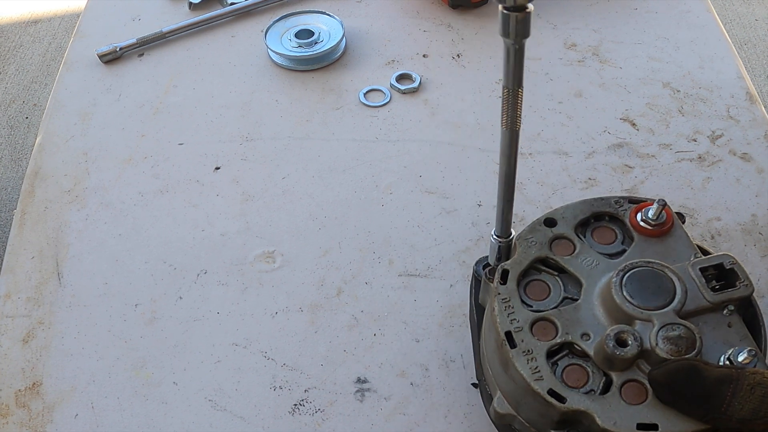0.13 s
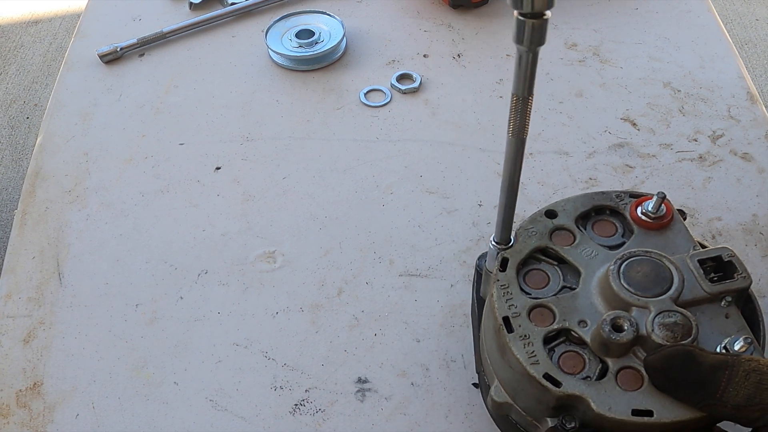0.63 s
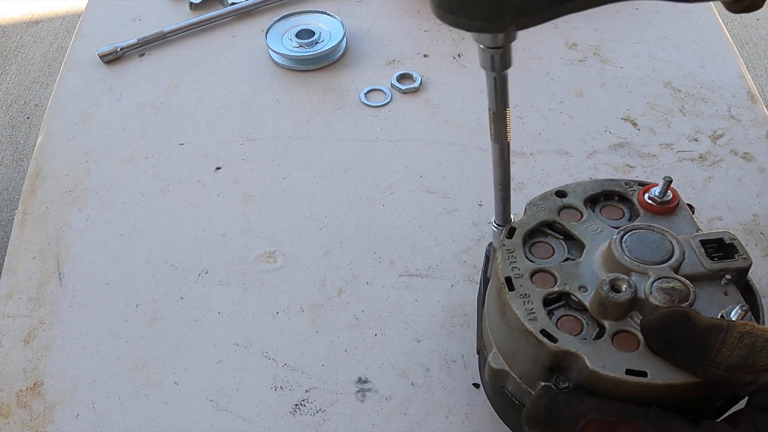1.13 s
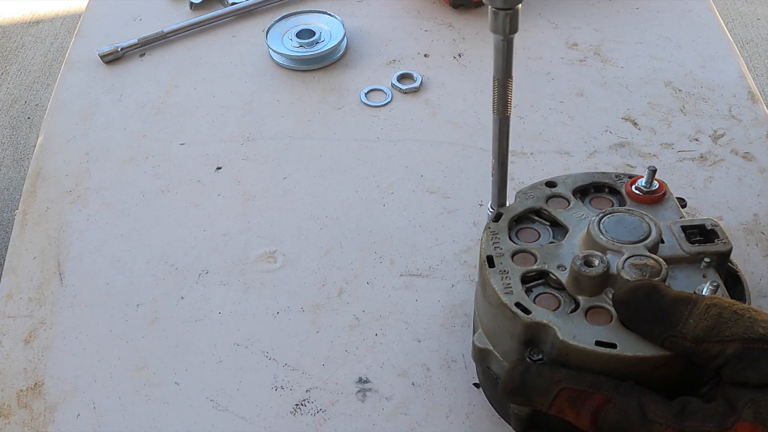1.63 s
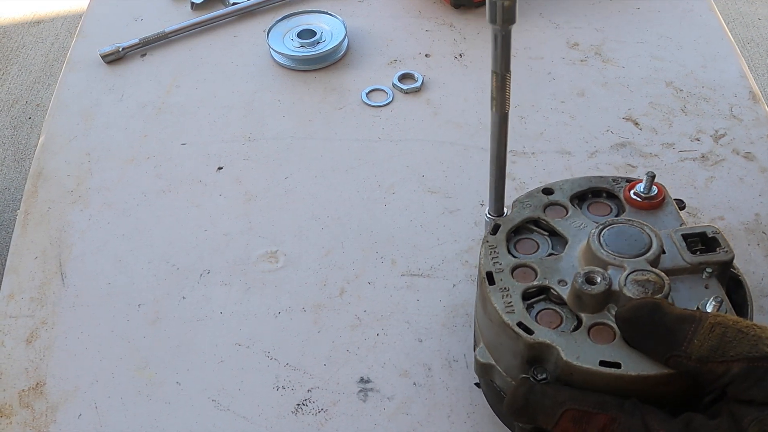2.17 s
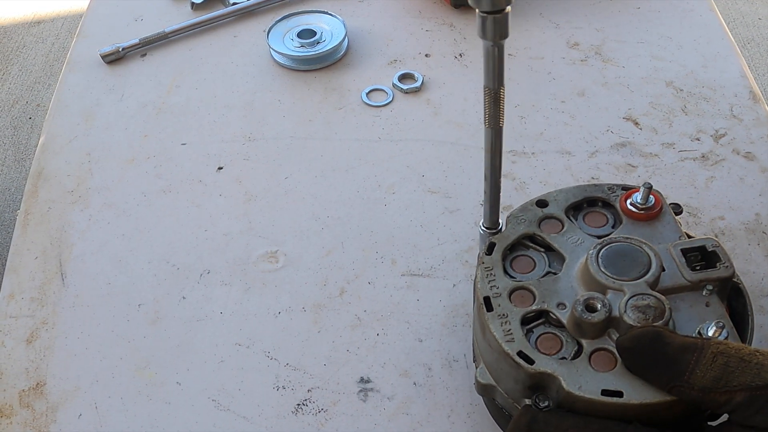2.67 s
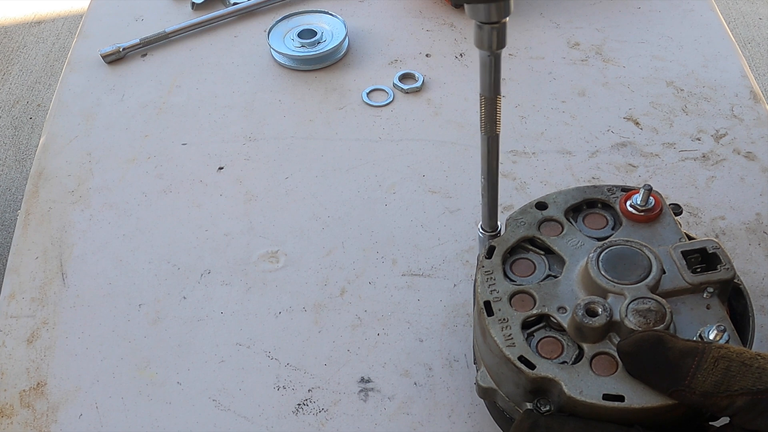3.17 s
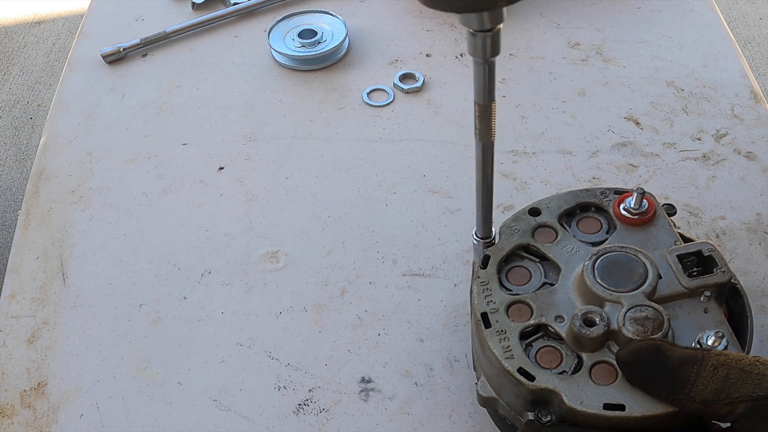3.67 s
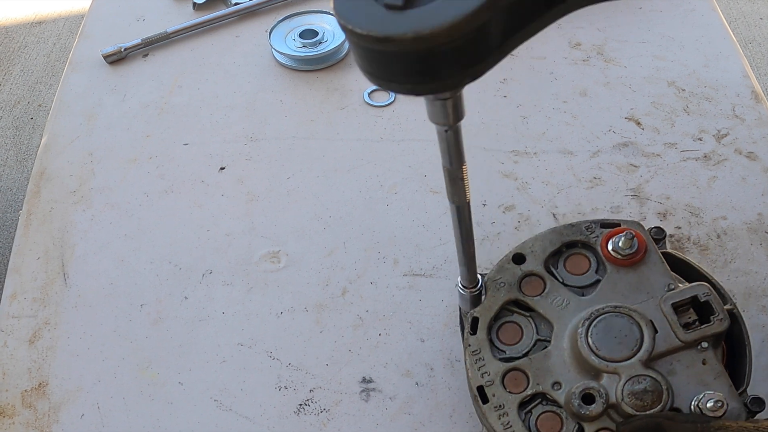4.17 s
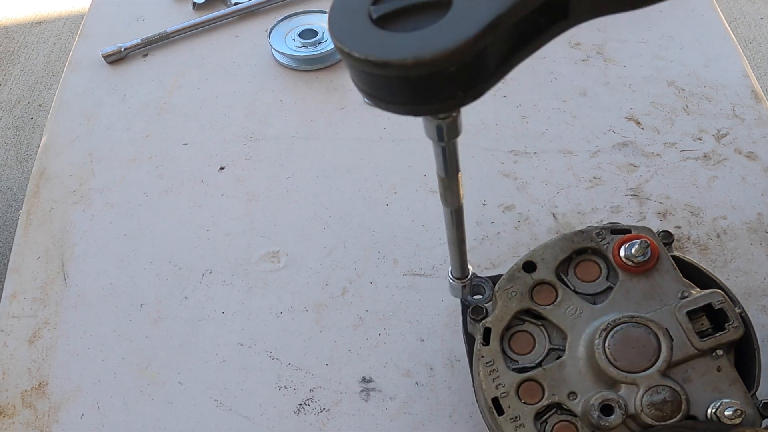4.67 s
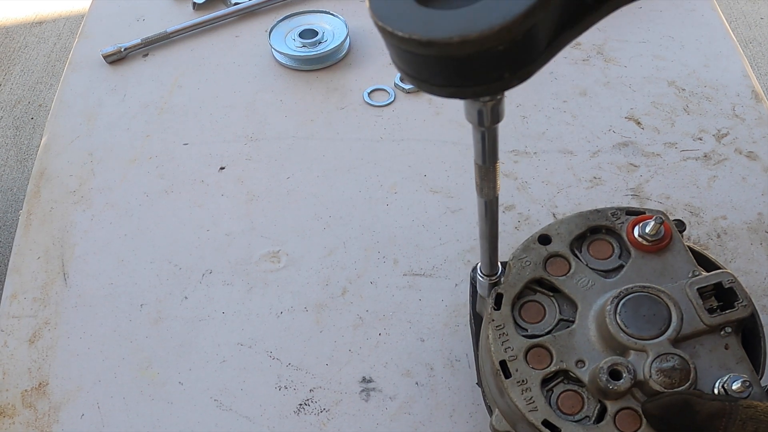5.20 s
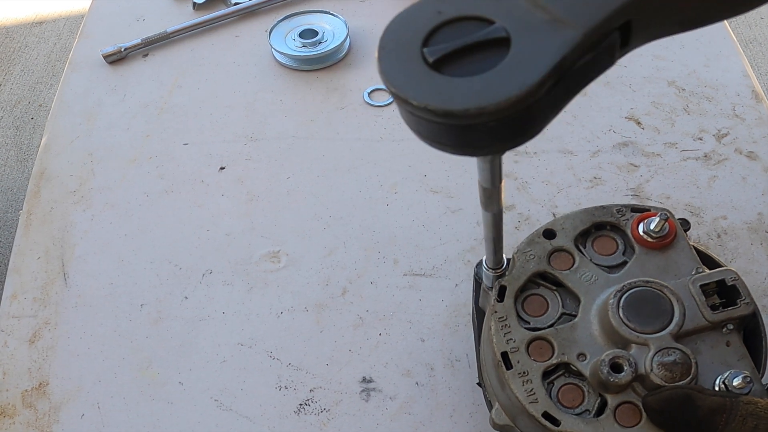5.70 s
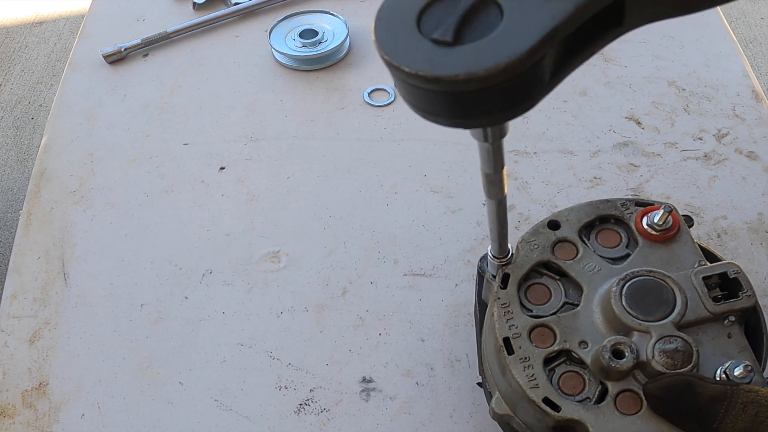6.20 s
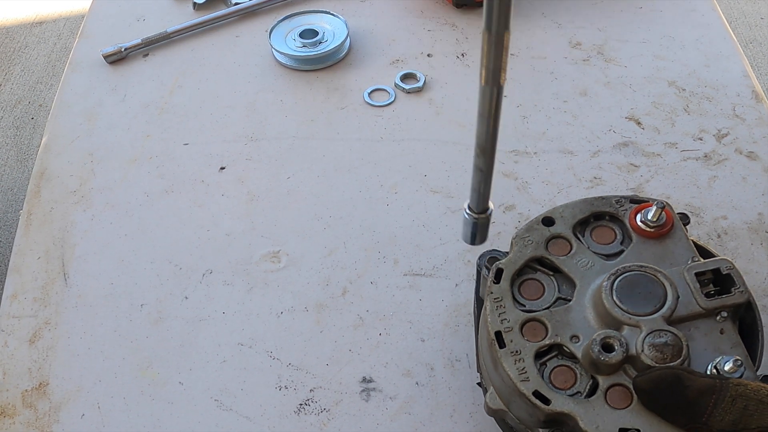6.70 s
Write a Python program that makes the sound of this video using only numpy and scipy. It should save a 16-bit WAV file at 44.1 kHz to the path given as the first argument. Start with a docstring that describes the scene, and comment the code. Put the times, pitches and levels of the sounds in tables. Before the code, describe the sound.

Near stereo microphones pick up an air-powered ratchet undoing bolts outdoors. First come light metallic taps, dull low knocks and distant chirps over low rumble. The tool starts abruptly, its dense airy roar fluttering fast over a thin steady whine, then cuts off with a quick falling pitch. Taps and thuds fill the gap before a second burst under a second long, with a short reflection from nearby walls.

```python
"""Air ratchet on an outdoor workbench

An air ratchet backs two bolts out of a cast metal case, in a long burst and a short one. Noise makes its
hiss, sine tones geared to one rotor its whine; each crank turn lifts the hiss twice, dips it, and rings the
pawl. Around the bursts the socket clinks (noise ringing damped modes), the bench thuds (low dying tones) and
small birds chirp (gliding tones). A low rumble (filtered noise) grows in the bursts; walls add a tail."""
import sys
import numpy as np
from scipy import signal
from scipy.fft import rfft, irfft, next_fast_len
from scipy.io import wavfile
from scipy.ndimage import uniform_filter1d

SR = 44100
rng = np.random.default_rng(int(sys.argv[2]) if len(sys.argv) > 2 else 0)


def attenuation_scalar(level_db):
    """Turn a level in dB into a linear amplitude multiplier (20 dB per decade)."""
    decades = np.asarray(level_db, float) / 20
    return 10 ** decades


def master(y):
    """Save y as 16-bit WAV."""
    cut = np.clip(np.atleast_2d(y).T, -1, 1)
    pcm = np.round(cut * 32767)  # scale
    wavfile.write(sys.argv[1], SR, pcm.astype(np.int16))


N = 301193
T = np.arange(N) / SR

# The two squeezes of the trigger: open_s, shut_s, quick_spin_up_s, slow_settling_s
TRIGGER_PULLS = [(1.162, 4.555, .023, .11), (5.71, 6.535, .028, .06)]
ROTOR_HZ = 489.3  # full speed, turns per second


def evened(x):
    """Scales a sound to an rms of 1."""
    return x / np.sqrt(np.mean(x ** 2) + 1e-20)


def read(points, hz):
    """Reads a spectrum between its points, on a log-frequency axis."""
    f, value = np.transpose(points)
    return np.interp(np.log(hz + 1), np.log(f + 1), value)


def coloured(x, points):
    """Filters a sound by a spectrum of (Hz, dB) points."""
    size = next_fast_len(x.shape[-1])
    gain = attenuation_scalar(read(points, np.fft.rfftfreq(size, 1 / SR)))
    return irfft(rfft(x, size) * gain, size)[..., :x.shape[-1]]


def wander(size):
    """Slow random drift of rms 1; a larger size (in samples) drifts more slowly."""
    once = uniform_filter1d(rng.standard_normal(N), size)
    return evened(uniform_filter1d(once, size))


def add(mix, s, sound):
    """Mixes a sound in at s seconds."""
    part = mix[round(s * SR):][:len(sound)]
    part += sound[:len(part)]


def curves(table):
    """Joins the rows of a table by straight lines in time, one curve for each column."""
    s, *values = np.transpose(table)
    return [np.interp(T, s, v) for v in values]


def low_rumble():
    """Low outdoor rumble plus the running tool's own low rumble, louder during the bursts: filtered noise."""
    # Shape of the rumble's spectrum: pitch_hz, level_db (per Hz, relative)
    spectrum = [(12, -25), (20, -1), (45, -1), (63, 4.5), (85, -3), (125, 0.5), (170, -4), (291, -21),
                (458, -31), (783, -28), (3060, -43), (3700, -44.5), (4460, -47), (9690, -60.5),
                (12000, -63), (15600, -102), (22000, -120)]
    # Level of outdoor and tool rumble together: time_s, level_db (before a 2 dB lift)
    rumble_levels = [(0.0, -53.5), (1.14, -53.5), (1.4, -57), (1.65, -51), (2.3, -49.5), (3.3, -51.5),
                     (4.3, -52.5), (4.8, -63.5), (5.1, -60.5), (5.95, -50), (6.15, -55), (6.83, -60.5)]
    level_db = curves(rumble_levels)[0] + 2.0 + 0.57 * wander(size=3000)
    return attenuation_scalar(level_db) * evened(coloured(rng.standard_normal(N), spectrum))


def clinks():
    """A few ms of rattling contact drives the damped modes of the case, one main ring and a dull crack."""
    # Socket on the case: contact_s (fullest contact, near this time; the sound begins 18 ms earlier), peak_db,
    # main_ring_hz, rattle_s, treble_tilt_db (per octave)
    hits = [(0.0014, -51, 2300, 0.02, -13), (0.107, -48, 4390, 0.002, 7), (0.124, -28, 4760, 0.0047, 3),
            (0.14, -37.5, 4100, 0.0078, -3), (0.287, -49.5, 3370, 0.0014, -3),
            (0.298, -50, 826, 0.0027, -3), (0.5936, -52, 883, 0.003, -2.5), (0.616, -43.5, 1160, 0.0027, 1),
            (0.6774, -67, 4680, 0.002, 9), (0.725, -47.5, 835, 0.0027, -2.5), (0.783, -44, 6340, 0.0022, 6),
            (0.7916, -32.5, 3760, 0.0018, 3.5), (1.054, -48, 1780, 0.0029, -11),
            (1.081, -50, 890, 0.002, -7), (1.123, -44, 816, 0.00091, -13), (4.95, -41, 2940, 0.0022, 5.5),
            (4.968, -53.5, 2970, 0.0029, 1), (5.087, -37, 4660, 0.003, -3.5),
            (5.1841, -54.5, 3660, 0.0017, -6), (5.541, -44.5, 1310, 0.005, -0.5),
            (5.567, -43, 1600, 0.0039, -6), (5.621, -55, 840, 0.0022, -16), (6.659, -51, 1440, 0.002, -1),
            (6.788, -42.5, 818, 0.004, -2.5)]
    # Ringing modes of the case: pitch_hz, level_db (before the tilt), ring_s (to fall 60 dB, cut short below)
    case_modes = [(746, -20, 0.2), (1200, -20, 0.13), (1890, -22, 1.3), (3120, -27, 0.052),
                  (3500, -16.5, 0.069), (3690, -6, 0.086), (4300, 2, 0.12), (5270, -7, 0.13),
                  (5720, -3, 0.11), (6300, -23, 0.12), (6460, -40, 0.12), (7420, -2, 0.076),
                  (8220, -6, 0.087), (8600, -11, 0.092)]
    out, t = np.zeros(N), np.arange(4000) / SR
    meet_s, lead_s = .02, .018  # fullest contact within the sound; the sound begins this early
    for s, db, hz, length, tilt_db in hits:
        # the parts scrape together, meet, and rattle apart
        from_meeting = abs(t - meet_s)
        scrape = .12 * np.exp(-from_meeting / np.where(t < meet_s, .005, .014))
        contact = rng.standard_normal(len(t)) * (np.exp(-from_meeting / length) + scrape)
        modes = np.zeros(len(t))
        for f, mode_db, ring_s in case_modes:
            level_db = mode_db + tilt_db * np.log2(f / 3000) + 1.7 * rng.standard_normal()
            fading = attenuation_scalar(level_db - 60 * t / min(0.13 * ring_s, .02))
            modes += fading * np.sin(2 * np.pi * f * rng.uniform(1.0, 1.04) * t)
        main = attenuation_scalar(-60 * t / .016) * np.sin(2 * np.pi * hz * t)
        crack = coloured(contact, [(300, -26), (900, 6 - 1.2 * tilt_db), (2500, -4), (4800, 5.0),
                                   (9000, 1.6 * tilt_db - 4.5), (14000, 0.74 * tilt_db - 20.5)])
        ringing = signal.fftconvolve(contact, modes + 2.2 * main)[:len(t)]
        sound = evened(ringing) + 1.3 * evened(crack)
        skipped = round(max(lead_s - s, 0) * SR)  # what would fall before time zero
        add(out, max(s - lead_s, 0), attenuation_scalar(db) * sound[skipped:] / abs(sound).max())
    return out


def shed(x):
    """Diffuse two-channel tail from nearby walls: noise in which each band dies at its own speed."""
    # How long the tail lasts: pitch_hz, time_s (to fall 60 dB)
    tail_times = [(200, 0.41), (1000, 0.51), (4000, 0.47), (10000, 0.33)]
    hz, t, z = signal.stft(rng.standard_normal((2, SR)), SR, nperseg=256)
    fading = attenuation_scalar(-60 * t / read(tail_times, hz)[:, None]) * (t > .008)
    tail = signal.istft(z * fading, SR, nperseg=256)[1]
    return signal.fftconvolve(x[None], tail / np.linalg.norm(tail[0]), axes=1)[:, :N]


def thuds():
    """The bench top swells and rings low after each push, as a few dying sine tones."""
    # Pushes on the bench: start_s, level_db (of the main tone, before its swell and decay), pitch_hz
    pushes = [(0.152, -39.5, 195.6), (.23, -46, 201), (0.631, -36, 168.6), (.74, -40.5, 174.5),
              (.80, -34.5, 151.5), (0.878, -43, 146), (5.105, -39, 159), (5.165, -42, 164),
              (5.399, -42.5, 150), (5.47, -50.5, 131), (5.536, -40, 169), (5.584, -40, 158.6),
              (5.625, -41.5, 158)]
    upper_rings = [(195, -9.5), (300, -21), (385, -23.5), (720, -31)]  # Hz, dB against the main tone
    out, t = np.zeros(N), np.arange(16000) / SR
    for s, db, hz in pushes:
        tones = np.sin(2 * np.pi * hz * t)
        for up_hz, up_db in upper_rings:
            tones += attenuation_scalar(up_db) * np.sin(2 * np.pi * (up_hz * t + rng.random()))
        swell = 1 - np.exp(-t / 0.0025)
        add(out, s, attenuation_scalar(db - 60 * t / 0.21) * swell * tones)  # falls 60 dB in 0.21 s
    return out


def birds():
    """Gliding, husky notes with a fast uneven warble, smeared by far echoes made of dying noise."""
    # Notes: start_s, length_s, first_hz, last_hz (of the glide, before the warble), level_db (before the echoes)
    notes = [(0.368, 0.063, 4300, 4370, -69), (0.383, 0.067, 4000, 3520, -66.5),
             (0.598, 0.06, 3920, 4750, -65), (0.617, 0.073, 4750, 4650, -70),
             (0.795, 0.032, 4500, 4430, -62), (0.807, 0.046, 3900, 3700, -71),
             (0.957, 0.052, 3970, 3960, -74), (0.971, 0.061, 4630, 4660, -70),
             (4.832, 0.073, 2860, 2950, -71.5), (4.971, 0.059, 3000, 2760, -66.5),
             (5.109, .09, 3770, 3340, -69), (5.207, 0.076, 2900, 2744, -70),
             (5.46, 0.068, 4050, 4060, -78.5), (5.485, 0.056, 3640, 3520, -74),
             (5.606, 0.19, 3620, 3730, -71), (6.777, 0.051, 3910, 3760, -72)]
    out, husk = np.zeros(N), wander(size=70)
    for s, length, first_hz, last_hz, db in notes:
        t = np.arange(round(length * SR)) / SR
        glide_hz = first_hz + (last_hz - first_hz) * t / length
        warble_hz = 120 * np.sin(2 * np.pi * (95 * t + rng.random()))
        hz = glide_hz + warble_hz + 85 * husk[round(s * SR):][:len(t)]
        note = np.sqrt(2) * np.sin(2 * np.pi * np.cumsum(hz) / SR)
        add(out, s, attenuation_scalar(db) * note * signal.windows.tukey(len(t), .6))
    t = np.arange(SR // 2) / SR
    echoes = rng.standard_normal((2, len(t))) * attenuation_scalar(-60 * t / 0.46)
    echoed = signal.fftconvolve(out[None], echoes / np.linalg.norm(echoes[0]), axes=1)[:, :N]
    return 0.88 * out + 0.74 * echoed


def air_flow():
    """Level of the air against its steady flow in dB: rise, surge, hold, then cut-off after the trigger shuts."""
    lead_s = .012  # the air comes before the rotor
    rise_db, rise_s, surge_db, surge_s = 47, 0.013, 3.5, .15
    linger_s, cut_db_per_s = 0.069, 848.5
    flow_db = np.full(N, -90.)
    for opened, shut, _, _ in TRIGGER_PULLS:
        since = T - opened + lead_s
        surge = surge_db * np.exp(-abs(since) / surge_s)
        rise = rise_db * np.exp(-abs(since) / rise_s)
        cut = cut_db_per_s * np.maximum(T - shut - linger_s, 0)
        flow_db = np.where(since > 0, np.maximum(surge - rise - cut, -90), flow_db)
    return flow_db


def rotor_turns():
    """Counts turns: the rotor spins up when the trigger opens and sags as the air runs out."""
    sag_s = .125
    speed = np.zeros(N)  # share of full speed
    for opened, shut, quick, slow in TRIGGER_PULLS:
        since = np.maximum(T - opened, 0)
        up = 1 - .85 * np.exp(-since / quick) - .15 * np.exp(-since / slow)
        down = np.exp(-(np.maximum(T - shut, 0) / sag_s) ** 2)
        speed = np.maximum(speed, up * down)
    unsteady = 1 + .0012 * wander(size=900)
    return np.cumsum(ROTOR_HZ * np.maximum(speed, 0) * unsteady) / SR


def tone(turns, multiple, db, flutter_db):
    """A sine at a multiple of a shaft's speed, with a fluttering level."""
    level = np.sqrt(2) * attenuation_scalar(db + flutter_db * wander(size=500))
    return level * np.cos(2 * np.pi * (multiple * turns + rng.random()))


def exhaust(crank, hiss_db, mid_db, treble_db, top_db):
    """Air hiss through the housing; each crank turn lifts it twice, then dips it, for a few ms each.
    Two unrelated draws: the shared sound and the part that differs between the microphone capsules."""
    # Level changes within one crank turn: turn_share (0-1), change_db (on average, scaled by band),
    # dull_share (0-1)
    knocks = [(.0, 8, 0.29), (.27, 6, 0.6), (.62, -2.5, .8)]
    # Shape of the hiss, before each band is levelled: pitch_hz, level_db (per Hz, relative)
    hiss_shape = [(260, -48.5), (450, -21), (478, -24.5), (522, -17), (652, -14), (803, -7.5), (1160, -6.5),
                  (2300, -7), (3490, -3.5), (3810, -2.5), (4980, -5.5), (5690, -3), (9560, -3.5),
                  (12900, -24.5), (15600, -31)]
    # Peaks and dips of the housing: pitch_hz, width_hz, change_db
    housing_peaks_and_dips = [(771, 88, 8), (825, 48, 5), (920, 62, 3), (2100, 200, 1.5), (4060, 850, -0.5),
                              (5130, 450, -2.5), (5580, 280, 2.5), (8420, 200, -7.5), (8630, 180, 6),
                              (8920, 110, 4), (12900, 600, 9)]
    count = int(crank[-1]) + 2
    chance = rng.standard_normal((count, len(knocks), 2))
    dull, sharp = np.zeros(N), np.zeros(N)  # level change in dB
    for k, (share, change_db, dullness) in enumerate(knocks):
        since = crank - share + 1
        turn = since.astype(int)
        fading = np.exp(-(since % 1) / 0.19)
        dull += dullness * fading * (change_db + 1.0 * chance[turn, k, 0])
        sharp += (1.3 - dullness) * fading * (change_db + 2.2 * chance[turn, k, 1])
    dull, sharp = uniform_filter1d(dull, size=40), uniform_filter1d(sharp, size=30)
    hz = np.fft.rfftfreq(N, 1 / SR)
    housing_db = sum(db / (1 + (2 * (hz - f) / width) ** 2) for f, width, db in housing_peaks_and_dips)
    colour = attenuation_scalar(read(hiss_shape, hz) + housing_db)
    # steep splits into five bands
    over_5k, over_7k, over_11k, over_12k = (1 / (1 + (edge / (hz + 1)) ** 50)
                                            for edge in (5000, 7500, 10900, 11900))
    bands = [(1 - over_5k, dull, -2.6),
             (over_5k - over_7k, 0.45 * (dull + sharp), mid_db + .3),
             (over_7k - over_11k, sharp, treble_db + 1.46),
             (over_11k - over_12k, 0.78 * sharp, top_db + 0.27),
             (over_12k, 1.2 * sharp, -17.5)]
    out = np.zeros((2, N))
    for share, knocks_db, db in bands:
        air = rng.standard_normal((2, N)) * attenuation_scalar(knocks_db + 0.91 * wander(size=50))
        filtered = irfft(rfft(air) * colour * np.sqrt(np.maximum(share, 0)), N)
        out += attenuation_scalar(db) * evened(filtered)
    return attenuation_scalar(hiss_db) * out


def pawl_pings(crank, treble_db):
    """Once a crank turn the pawl snaps over a tooth and rings briefly, in runs of harder and softer snaps."""
    # Rings of the pawl tooth: pitch_hz, level_db (relative), ring_s (to fall 60 dB)
    tooth_rings = [(8470, 2.5, 0.0092), (9500, -5.5, 0.022), (6400, -3, .008)]
    force_db = -6.5 + 6.5 * np.clip(wander(size=700), -3, 1.5)  # against the treble of the hiss
    snaps = np.diff(np.floor(crank), prepend=0) * attenuation_scalar(treble_db + force_db)
    t = np.arange(700) / SR
    scrape = uniform_filter1d(snaps, size=40) * rng.standard_normal(N)
    ring = sum(attenuation_scalar(db - 60 * t / t60) * np.sin(2 * np.pi * hz * t) for hz, db, t60 in tooth_rings)
    return np.sqrt(SR / 2) * signal.oaconvolve(scrape, ring / np.linalg.norm(ring))[:N]


def shaken_bench(crank, gliding, flow_db):
    """Low crank tones pass into the bench, whose own rings (filtered noise) answer unsteadily."""
    # Rings of the bench: pitch_hz, unsteady_share (noise against tone at steady speed)
    bench_rings = [(64, 1.3), (140, 0.35), (194, 1.4), (300, 4.0)]
    # How each ring is shaken: firm_grip_db, grip_share (of the grip's changes), jolt_change_db, slow_drift_db
    shaking = [(-56.5, 0.41, 18.5, 3.5), (-39, 1.0, -0.5, 0.2), (-49.5, 0.5, 9.5, 3.5), (-57, 0.53, 8, 4.5)]
    # How hard the crank shakes the bench: time_s, grip_db (only its distance from a firm grip counts)
    grip = [(1.19, -42), (1.3, -37), (1.44, -38), (1.52, -40), (2.48, -40), (2.6, -44.5), (3.72, -47.5),
            (3.9, -50), (4.48, -58.5), (4.56, -88.5), (5.75, -68), (5.795, -40), (5.9, -44.5), (6.2, -40.5),
            (6.59, -40), (6.7, -45)]
    # The bolt gives way: time_s, half_length_s, strength (0-1)
    jolts = [(1.308, .08, 1.0), (2.229, 0.031, 0.5), (5.777, .03, 0.4)]
    out, (grip_db,) = np.zeros(N), curves(grip)
    firm_db = -40
    jolt = sum(strength * np.exp(-((T - s) / half) ** 4) for s, half, strength in jolts)
    running_db = uniform_filter1d(np.clip(flow_db, -60, 0), size=2500)
    for k, ((hz, unsteady), (ring_db, share, jolt_db, drift_db)) in enumerate(zip(bench_rings, shaking)):
        db = ring_db + share * (grip_db - firm_db) + jolt_db * jolt
        db = db + drift_db * wander(size=3500) + running_db
        sharpness = 3.5 if k == 3 else 11.
        ring = signal.lfilter(*signal.iirpeak(hz, sharpness, SR), rng.standard_normal(N))
        unsteady = unsteady + 1.5 * gliding ** 2  # noisier while the speed changes
        steady = (1 - gliding ** 2) * tone(crank, k + 1, db, 1.1)
        out += (steady + unsteady * attenuation_scalar(db) * evened(ring)) / np.sqrt(1 + unsteady ** 2)
    return out


def ratchet():
    """The running tool: hiss, rotor tones, crank tones and pawl pings, all geared to one speed."""
    # Tones of the rotor: multiple (of its speed), level_db (against the load below)
    rotor_tones = [(1, -57.5), (3, -54.5), (5, -53.5), (7, -59.5), (13, -59.5)]
    # Tones of the crank: multiple (of its speed), level_db (against the load below)
    crank_tones = [(4, -62), (5, -62), (6, -66), (8, -67), (9, -65), (10, -62), (11, -55), (12, -51),
                   (13, -55), (16, -57), (21, -60)]
    # How the tool is held: time_s, facing (exhaust towards the microphones, 0-1),
    # treble_db (7.5-11 kHz hiss, before a trim), whine_db (gear whine at steady speed, before a trim)
    aim = [(1.2, 0.2, -8, -33), (1.45, 0.26, -10.5, -45.5), (2.1, 0.25, -11.5, -40.5), (2.5, 0.6, -11, -40),
           (3.1, 0.83, -9, -44), (3.75, 0.87, -9, -47.5), (4.2, 0.85, -7.5, -41.5), (4.45, 0.13, -9.5, -52),
           (4.6, 0, -12, -45), (5.75, 0.4, -7, -49.5), (6.0, 0.09, -7.5, -42.5), (6.5, .05, -6.5, -44),
           (6.6, 0.02, -9, -48)]
    # Effect of facing, columns away_db, near_db; rows: 5-7.5 kHz hiss, 11-12 kHz hiss (both before a trim),
    # vane tone at steady speed, air level, side level of the middle band
    turned_levels = [(-8.5, -2.5), (-33.5, -13.5), (-46, -66.5), (-0.72, -1.5), (-33, -11.5)]
    flow_db = air_flow()
    facing, treble_db, whine_db = curves(aim)
    facing = np.clip(facing, 0, 1)
    blends = facing ** 2, facing, facing, facing, facing ** 2
    mid_db, top_db, vane_db, turned_db, side_db = (
        away + blend * (near - away) for (away, near), blend in zip(turned_levels, blends))
    hiss_db = -32 + flow_db + turned_db
    turns = rotor_turns()
    crank = turns / 7.13  # gearing
    load_db = hiss_db + 30.0
    slack = np.clip(1 - np.gradient(turns) * SR / ROTOR_HZ, 0, 1)  # share of speed still missing
    gliding = np.clip(slack / .035, 0, 1)  # while the speed changes, tones follow the air
    whine_db += gliding * (hiss_db - 9. - 36 * slack - whine_db)
    vane_db += gliding * (hiss_db - 12.5 - 26 * slack - vane_db)
    twice_db = -50.5  # tone at twice the rotor speed, when steady
    twice_db = twice_db + gliding * (hiss_db - 28.0 - twice_db)
    whine = tone(turns, 8, whine_db + .5, 1.3)
    whine += tone(turns, 4, vane_db, 2.0)
    whine += tone(turns, 2, twice_db, 1.6)
    orders = sum(tone(turns, k, db + load_db, 1.9) for k, db in rotor_tones)
    teeth = sum(tone(crank, k, db + load_db, 3.3) for k, db in crank_tones)
    hiss, apart = exhaust(crank, hiss_db, mid_db, treble_db, top_db)
    tool = hiss + whine + orders + teeth + pawl_pings(crank, hiss_db + treble_db)
    return tool, apart, facing ** 2, side_db, shaken_bench(crank, gliding, flow_db)


def freed_bar():
    """The freed extension bar rings on as one dying tone."""
    t = np.arange(SR // 3) / SR
    return attenuation_scalar(-55 - 60 * t / .5) * np.sin(2 * np.pi * 950 * t) * np.minimum(t / .01, 1)


def scene():
    """The capsules share almost everything; the tool's air and the bench differ, the top treble leans right."""
    # Side colour of the tool's air and the wall tail: pitch_hz, gain_db
    side_colour = [(450, 0), (700, -22), (1300, -41.5), (2000, -39.5), (10500, -22.5), (11500, -2.5),
                   (13000, 0.5)]
    tool, apart, turned, side_db, bench = ratchet()
    knocks = clinks()
    near = tool + knocks
    add(near, 4.625, freed_bar())
    room, other_room = attenuation_scalar(-19.0) * shed(near - .5 * knocks)  # the clinks reach the walls weakly
    chirps, other_chirps = birds()
    mid = room + chirps + low_rumble() + near + bench + thuds()
    middle = coloured(apart + other_room + other_chirps, [(1300, -24), (2500, -11), (4400, 1.5), (6000, -12),
                                                          (10000, -9.5), (11500, -31.0)])
    side = coloured(apart + other_room, side_colour) + attenuation_scalar(side_db) * middle
    # the whine reaches the right capsule first when the tool turns
    whine = coloured(tool, [(3000, -27.5), (4000, 3.5), (5200, -31.5)])
    side -= turned * (.35 * np.gradient(whine) + .06 * whine)
    # the running tool shakes the capsules unequally
    side += attenuation_scalar(-16.5 + 7 * turned + air_flow()) * low_rumble()
    side += attenuation_scalar(-32.5) * shed(bench)[0]
    side -= coloured(mid, [(10000, -40.5), (11500, -8), (13000, -7.5)])
    return np.array([mid + side, mid - side])


def top_cut(x):
    """Nothing passes above the cut-off."""
    return signal.sosfilt(signal.butter(12, 15750, fs=SR, output="sos"), x)


def record(dry):
    """Turns the finished mix into the sound that is written out."""
    return top_cut(dry)


dry = scene()
out = record(dry)
master(out)
```